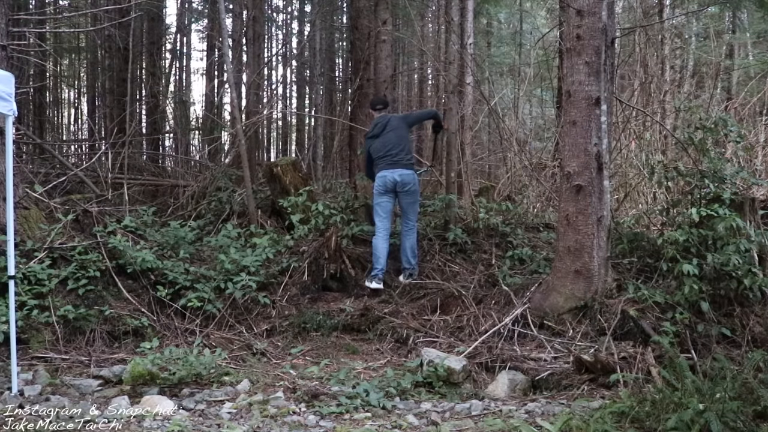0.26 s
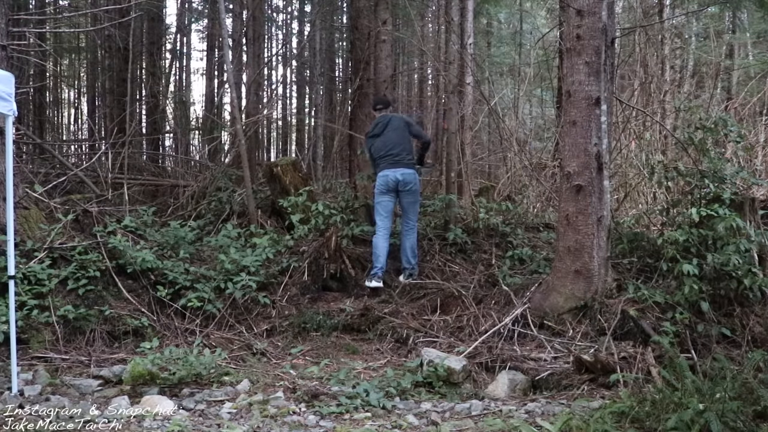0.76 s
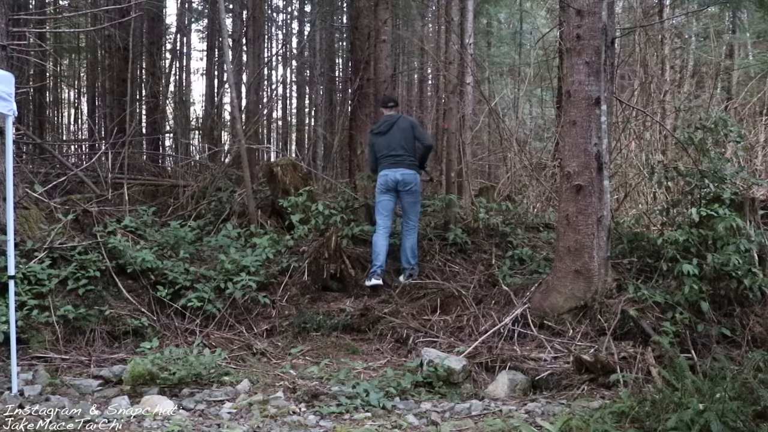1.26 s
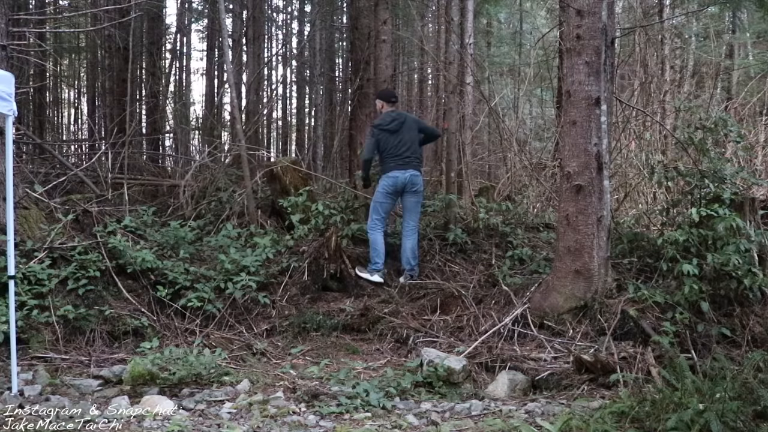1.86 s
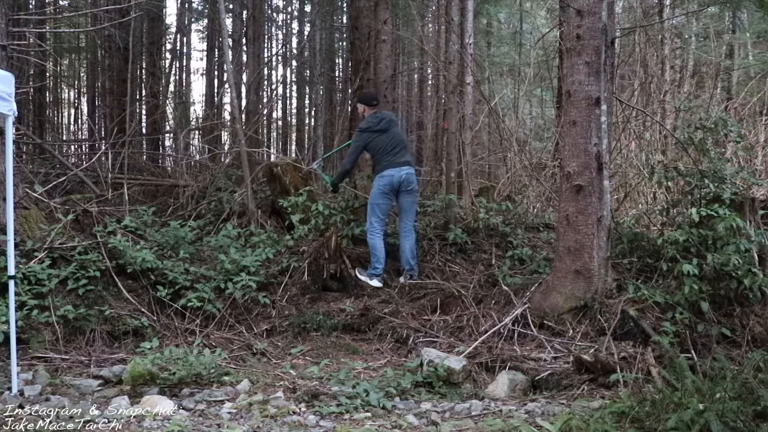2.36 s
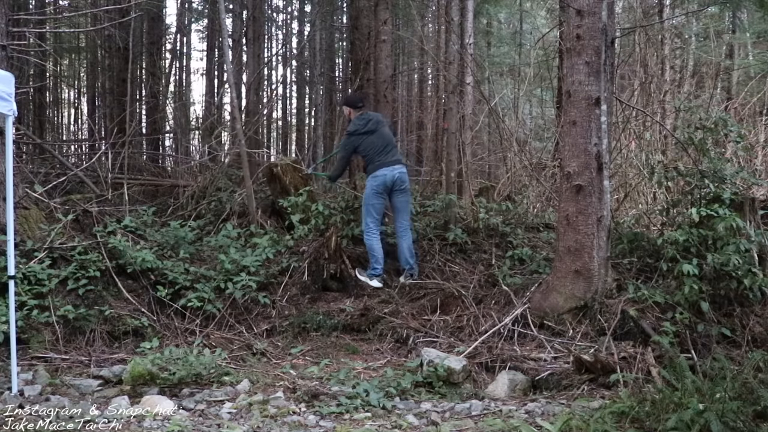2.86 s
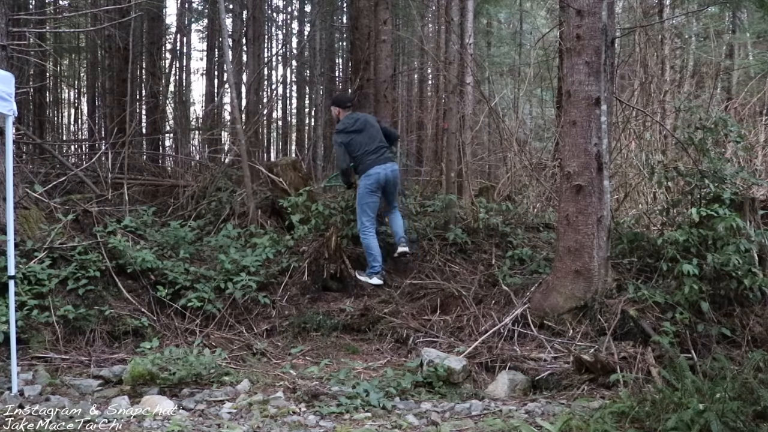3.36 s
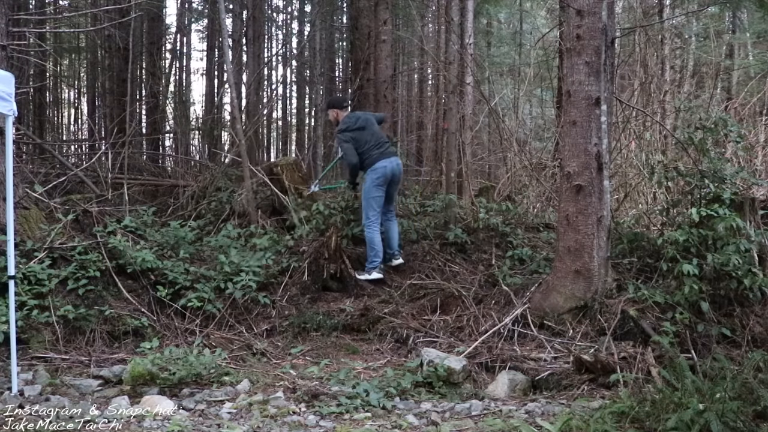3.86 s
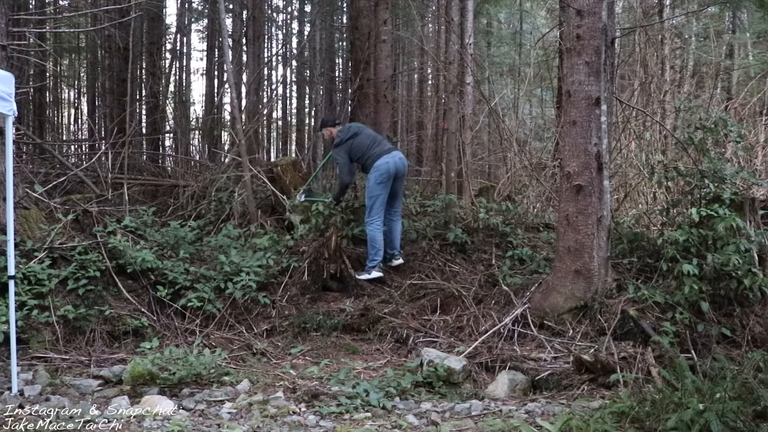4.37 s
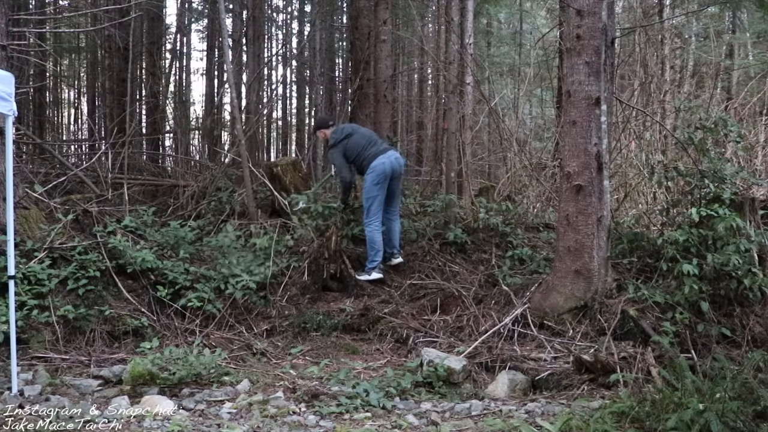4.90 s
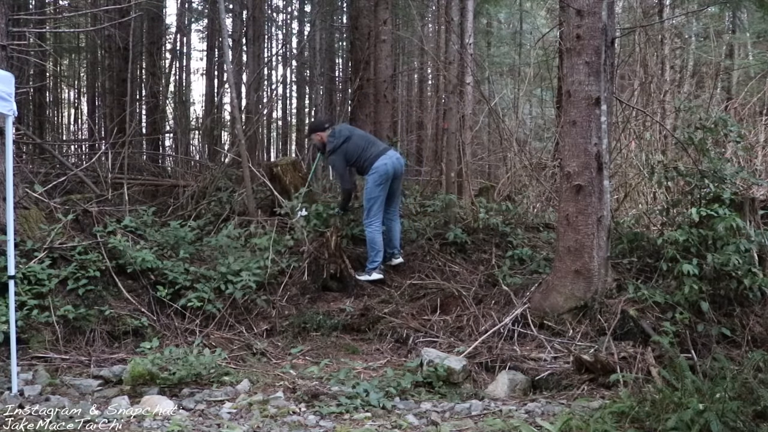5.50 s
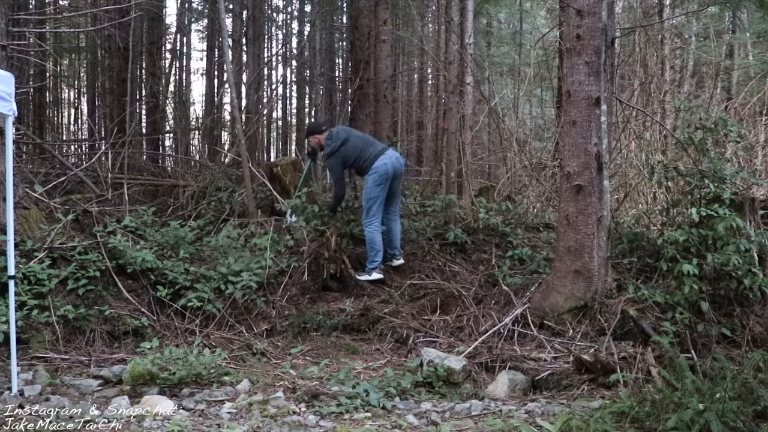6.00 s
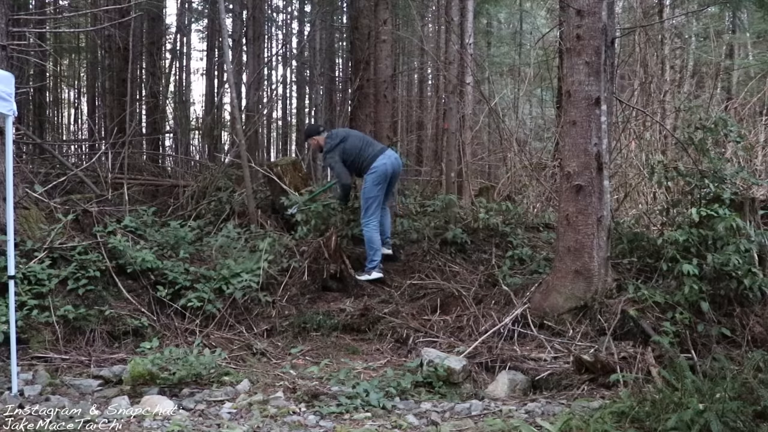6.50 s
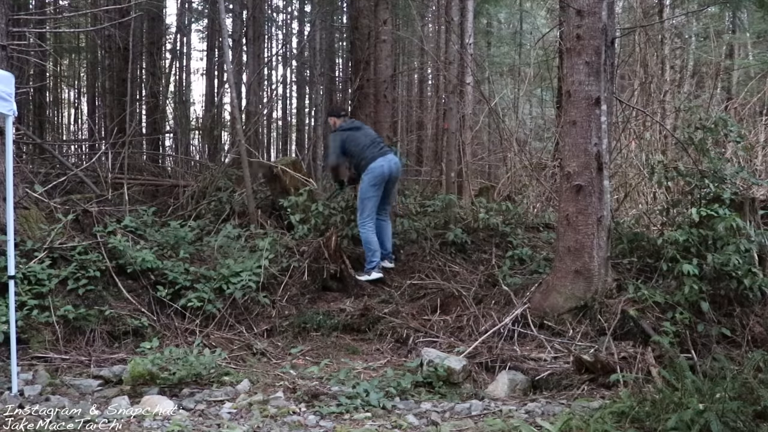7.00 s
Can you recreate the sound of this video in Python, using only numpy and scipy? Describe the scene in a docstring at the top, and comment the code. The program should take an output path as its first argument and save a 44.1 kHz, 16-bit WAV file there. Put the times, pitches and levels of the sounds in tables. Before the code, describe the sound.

Very quiet forest air, then loppers crunch through a branch with a splintering crack; the wood drops with a thud and the steel jaws clack. Twigs snap and litter crunches underfoot. Four more cracks follow at uneven gaps, the last two close together, each with shaken leaves and a metallic clack. Heard from some metres away, with thin echoes from the trunks.

```python
"""Faint outdoor air and small twig snaps open a quiet forest edge; at 0.83 s loppers cut the first branch.
It splits in a quick run of fibre-break bursts ringing the stem; wood drops, steel jaws clack and chatter.
Twigs snap, brush and litter rustle as filtered grains, and steps crunch and thud as the worker moves.
Four more cuts follow near 3.0, 4.6, 6.2 and 7.1 s; noise echoes from the trunks trail each sound."""
import sys
import numpy as np
from scipy import signal
from scipy.fft import rfft, irfft
from scipy.io import wavfile

SR = 44100
rng = np.random.default_rng(int(sys.argv[2]) if len(sys.argv) > 2 else 0)


def pcm_store(signal):
    """Save signal as 16-bit PCM."""
    levels = np.round(np.clip(np.atleast_2d(signal), -1, 1) * 32767)
    wavfile.write(sys.argv[1], SR, levels.astype(np.int16).T)


N = 319725
TIME = np.arange(N) / SR
LEVEL_WINDOW_S = 0.005  # snap and tick levels are rms over this

# branches cut through: (time [s], stem note [Hz], ring [dB], wood body over crack [dB], thud [dB],
# shaken brush [dB], settling [dB/s])
CUTS = [(0.829, 860, -2.5, 2.5, -36, -40, 60), (3.027, 1113, 5, -0.5, -49, -45.5, 32.5),
        (4.632, 767, -7, -2.5, -45, -42, 24), (6.226, 1254, -5, -2.5, -45, -38.5, 45),
        (7.059, 1230, 3, 1.5, -48, -44.5, 66)]
# shoes pressing litter and springy ground: (time [s], crunch [dB], length [s], thud [dB])
STEPS = [(1.157, -39.5, 0.045, -41.5), (1.874, -48.5, 0.033, -47), (3.31, -50.5, .09, -63.5),
         (3.551, -48.5, 0.052, -41), (3.63, -47, 0.067, -42), (3.69, -45.5, 0.069, -38.5),
         (3.83, -56.5, 0.025, -49), (4.95, -48.5, 0.082, -60), (6.62, -46.5, 0.031, -53)]
# resonances of a branch: (frequency [Hz], level [dB], t60 [s])
BRANCH_MODES = [(570, -4, 0.029), (692, 4.5, 0.0088), (980, -4, 0.0055), (1346, 1, 0.031),
                (2130, 3.5, 0.021), (2970, -16, 0.016), (3090, -6, 0.01), (3930, -1.5, 0.059)]


def undb(db):
    """Decibels to gain."""
    return 10 ** (np.asarray(db) / 20)


def unit(x):
    """Scale to rms 1."""
    return x / np.sqrt(np.mean(x ** 2))


def norm(x):
    """Scale to energy 1."""
    return x / np.sqrt(np.sum(x ** 2) + 1e-18)


def add(out, s, x):
    """Mix x into out from time s."""
    i = int(s * SR)
    out[i:i + len(x)] += x[:max(N - i, 0)]


def cut(x, hz, kind, order=4):
    """Butterworth filter."""
    return signal.sosfilt(signal.butter(order, hz, kind, fs=SR, output="sos"), x)


def colour(x, points, size=4096):
    """Minimum-phase filter through (frequency [Hz], level [dB]) points."""
    hz, db = np.transpose(points)
    f = np.maximum(np.arange(size // 2 + 1) * SR / size, 1)
    gain = undb(np.interp(np.log(f), np.log(hz), db))
    # folding the cepstrum makes the response causal
    cepstrum = irfft(np.log(gain))
    cepstrum[1:size // 2] *= 2
    cepstrum[size // 2 + 1:] = 0
    response = irfft(np.exp(rfft(cepstrum)))
    return signal.fftconvolve(x, response)[:len(x)]


def fade(t, t60):
    """Exponential decay, 60 dB down after t60."""
    return np.exp(-np.log(1000) * t / t60)


def walk(rate):
    """Slow random curve with `rate` knots a second and a spread near 1."""
    knots = rng.standard_normal(int(N / SR * rate) + 2)
    return np.interp(TIME * rate, np.arange(len(knots)), knots)


def clicks(count, spread_db):
    """Dense clicks of either sign, a few much larger than the rest."""
    sizes = undb(spread_db * np.minimum(rng.exponential(size=count), 6))
    return rng.standard_normal(count) * sizes


def snap(length_s, levels_db, modes, ring_db, scatter_db, scatter_t60, detune, lead, pitch=1, size=6144):
    """One fibre goes first (`lead`), the rest follow and ring the modes; stems and ground scatter it."""
    # colour of the break: (frequency [Hz], level [dB])
    wood_tone = [(40, -45.5), (100, -22), (270, -27), (450, -15), (720, -1), (1050, 1), (1380, -0.5),
                 (1750, -2), (2100, -1), (2600, -5.5), (3300, 2), (3900, 1.5), (4700, -8), (16000, -32.5)]
    body_top_hz, crack_top_hz = 1864, 3964
    t = np.arange(size) / SR
    first = lead * (t == 0)
    rebound = undb(scatter_db) * norm(clicks(size, 1.1) * fade(t, scatter_t60))
    fibres = clicks(size, 2.5) * np.exp(-(t / length_s) ** 2)
    force = norm(first + norm(fibres)) + rebound

    hz, db, t60 = np.transpose(modes)[:, :, None]
    hz = hz * pitch * (1 + detune * rng.standard_normal(hz.shape))  # each piece has its own size
    ring = norm(np.sum(undb(db) * fade(t, t60) * np.cos(2 * np.pi * hz * t), axis=0))
    ringing = norm(signal.fftconvolve(force, ring)[:size])
    sound = norm(colour(force, np.array(wood_tone) * [pitch, 1])) + undb(ring_db) * ringing
    body = cut(cut(sound, body_top_hz * pitch, "low", order=2), 2460, "low")
    crack = cut(cut(sound, body_top_hz, "high"), crack_top_hz, "low", order=8)

    # the sharpest treble comes as the break starts
    tearing = norm(clicks(size, 6.0) * np.exp(-t / (1.2 * length_s)))
    tear = norm(first + tearing) + 2.03 * rebound
    edge_tone = [(4500, 1), (6500, 5), (9500, 0.0), (13000, 2.5), (16000, -10)]
    edge = colour(cut(tear, crack_top_hz, "high", order=6), edge_tone)
    parts = sum(undb(d) * norm(p) for d, p in zip(levels_db, (body, crack, edge)))
    return parts * np.sqrt(LEVEL_WINDOW_S * SR)


def branches():
    """Each cut is a run of fibre breaks ringing the stem, fullest near the break through the heartwood."""
    # fibre bundles giving way, before the output filter and trim:
    # (time [s], break length [s], crack level [dB], tearing edge over crack [dB])
    splits = [(0.7629, 0.0042, -24, -18), (0.7862, 0.0023, -23.5, -3), (0.793, .015, -21.5, -7),
              (.802, .01, -18, -12), (.812, 0.031, -16.5, -6), (0.8333, 0.0039, -18.5, -0.5),
              (.837, 0.0093, -17, -19.5), (2.944, 0.013, -35.5, -23.5), (2.966, 0.0058, -23.5, -13),
              (2.9781, 0.00097, -19, -10), (2.987, 0.028, -27, -4), (3.002, 0.0046, -15.5, -10),
              (3.021, .0046, -15, -15), (3.0259, .0056, -9.5, -12.5), (4.572, 0.0037, -25.5, -3.5),
              (4.602, 0.0034, -29, -20), (4.6081, 0.0066, -15.5, -16.5), (4.614, 0.0048, -13.5, -8),
              (4.624, 0.014, -22, -15.5), (4.633, .0048, -14.5, -7.5), (4.6382, 0.0043, -9.5, -12.5),
              (6.176, 0.011, -26.5, -16), (6.1938, 0.0034, -13.5, -5), (6.1998, 0.0011, -18.5, -23.5),
              (6.216, 0.0067, -12.5, -7.5), (6.221, 0.0059, -11, -14.5), (6.2252, .005, -15, -19.5),
              (7.043, 0.024, -22, -7.5), (7.055, 0.0045, -14, -8.5), (7.063, 0.007, -15.5, -9.5)]
    bark_thin_db, heart_s = 8.5, 0.023  # outer fibres have less body than the heartwood
    out = np.zeros(N)
    for s, length_s, db, edge_db in splits:
        through_s, note_hz, ring_db, body_db, *_ = min(CUTS, key=lambda row: abs(row[0] - s))
        outer = 1 - np.exp(-abs(through_s - s) / heart_s)
        levels_db = (db + body_db - bark_thin_db * outer, db, db + edge_db)
        modes = [*BRANCH_MODES, (note_hz, 6, .022)]
        add(out, s, snap(length_s, levels_db, modes, ring_db, scatter_db=-11, scatter_t60=.06,
                         detune=.025, lead=.35))
    return cut(out, 450, "high", order=2) * undb(-1.7)  # a thin stem radiates little bass


def jaws(size=12000):
    """The blade slips out of the cut, the steel rings briefly and the loose joint chatters."""
    # jaws coming free: (time [s], strongest note [Hz], ring [dB], crack level [dB], edge over crack [dB])
    clacks = [(1.023, 3420, 24, -39, -1.5), (1.702, 3686, -4, -25, -8.5), (3.279, 3760, -4.5, -28, -3.5),
              (4.8089, 3940, -8.5, -23, -7.5), (6.425, 3880, -18, -23, -7), (7.2033, 3370, 7, -27, -17)]
    # steel resonances: (frequency [Hz], level [dB], t60 [s])
    steel_modes = [(716, -13, 0.054), (1532, -8.5, 0.051), (2380, -12, 0.029), (3480, -18.5, 0.026),
                   (3870, -12.5, 0.021), (4170, -7, 0.046)]
    # colour of loose blade and handles: (frequency [Hz], level [dB])
    chatter_tone = [(600, -23), (1100, -8.5), (2200, -16.5), (3300, -20), (4100, 10.5), (4700, -12.5),
                    (5600, -18), (8000, -15.5), (12000, -16), (16000, -31)]
    body_db, chatter_db, chatter_t60_s = -9, -19.5, 0.39  # levels relative to the crack
    out, t = np.zeros(N), np.arange(size) / SR
    for s, note_hz, ring_db, db, edge_db in clacks:
        modes = [*steel_modes, (4500, -7, .04), (note_hz, 0, .035)]
        levels_db = (db + body_db, db, db + edge_db)
        add(out, s, snap(0.0037, levels_db, modes, ring_db, scatter_db=-6, scatter_t60=0.042,
                         detune=0.0045, lead=0.55))
        chatter = unit(colour(clicks(size, 3.5), chatter_tone)) * fade(t, chatter_t60_s)
        add(out, s + .002, undb(db + chatter_db) * chatter)
    return out


def ticks(size=2048):
    """Thin stiff needles and grit tick only in the highest treble."""
    # dry ticks: (time [s], level [dB])
    tick_rows = [(1.025, -32.5), (1.119, -46), (1.348, -45), (2.018, -45), (3.654, -41.5), (3.73, -49),
                 (6.643, -52)]
    tone = [(3000, -31), (7000, -14), (11000, -4), (13500, 1), (16000, 0.0)]
    out, t = np.zeros(N), np.arange(size) / SR
    for s, db in tick_rows:
        tick = colour(clicks(size, 1.7) * fade(t, 0.019), tone)
        add(out, s, undb(db) * norm(tick) * np.sqrt(LEVEL_WINDOW_S * SR))
    return out


def boughs(start_hz=270, rest_hz=55, size=20000):
    """Jolts send bending waves down the boughs; high ones run faster, so each arrives as a sinking thud."""
    # wood landing on the ground: (time [s], thud [dB], 1/e fade [s])
    drops = [(.951, -32.5, .05), (2.546, -59, 0.027), (2.841, -55, 0.017), (3.191, -51, .024),
             (4.008, -54, .008), (6.647, -48.5, 0.018)]
    cut_contact_s, step_contact_s, drop_contact_s = .01, .027, 0.0041
    cut_fade_s, step_fade_s = 0.092, 0.07
    out, t = np.zeros(N), np.arange(size) / SR
    hz = rest_hz + start_hz * np.exp(-t / .026)
    jolts = [(s, db, cut_contact_s, cut_fade_s) for s, _, _, _, db, _, _ in CUTS]
    jolts += [(s, db, step_contact_s, step_fade_s) for s, _, _, db in STEPS]
    jolts += [(s, db, drop_contact_s, fade_s) for s, db, fade_s in drops]
    for s, db, contact_s, fade_s in jolts:
        envelope = np.exp(-t / fade_s) * (1 - np.exp(-t / 0.0081))
        wave = np.sin(2 * np.pi * np.cumsum(hz) / SR) * envelope
        wave = cut(wave, 95, "high", order=1)  # the slow deep waves radiate weakly
        strike = norm(clicks(size, 6.7) * np.exp(-t / contact_s))
        contact = strike + 0.21 * norm(clicks(size, 0.99) * fade(t, 0.4))
        ground = norm(cut(cut(contact, 460, "low", order=2), 50, "high", order=2))
        thud = norm(norm(signal.fftconvolve(contact, wave)[:size]) + 0.93 * ground)
        add(out, s, undb(db) * thud * np.sqrt(0.0093 * SR))  # rms over 9.3 ms
    return out


def crackle(rate, spread_db, bed_db):
    """Tiny contacts at `rate` a second, each smeared by the foliage, over a soft bed of rubbing."""
    struck = (rng.random(N) < rate / SR) * rng.choice([-1, 1], N)
    grains = struck * undb(spread_db * np.minimum(rng.exponential(size=N), 4.5))
    power = signal.lfilter([1], [1, -np.exp(-1 / (0.0036 * SR))], grains ** 2)
    smeared = unit(np.sqrt(power) * rng.standard_normal(N))
    bed = undb(bed_db) * rng.standard_normal(N)
    return unit(smeared + 0.43 * unit(grains) + bed)


def pressing():
    """The weight of each step comes on, holds and lets go."""
    power = np.zeros(N)
    for s, db, length_s, _ in STEPS:
        half_s = length_s / 2
        power += undb(2 * db) * np.exp(-((TIME - s - half_s) / half_s) ** 4)
    return np.sqrt(power)


def steps(weight):
    """A shoe presses needles and rotten sticks into a short dull crunch."""
    tone = [(60, -11.5), (200, 1.5), (450, -7.0), (800, -1), (1300, -7), (2200, -11), (4000, -17.0),
            (5000, -27.5), (16000, -28.5)]
    return unit(colour(crackle(rate=540, spread_db=12, bed_db=-1.5), tone)) * weight


def twig(db, thickness):
    """Small dry wood breaks in one go; a thicker stick is duller, lower and slower."""
    tilt_db, edge_db, dull_db = 15.5, -16.5, 12  # thick sticks trade crack for body and lose their edge
    levels_db = (db - tilt_db * (1 - thickness), db - tilt_db * thickness, db + edge_db - dull_db * thickness)
    bulk = thickness ** 2
    return snap(.002 + 0.0036 * bulk, levels_db, BRANCH_MODES, ring_db=-4, scatter_db=-9,
                scatter_t60=0.064, detune=.08, lead=.55, pitch=2 ** (-.7 * bulk))


def twigs(rustle):
    """A few sticks snap clearly; many small ones go at random, as hard as the brush is moving."""
    # louder sticks: (time [s], level before tilt and output trim [dB], thickness [0-1])
    loud_twigs = [(0.027, -50, 0.37), (.949, -26, 1), (1.192, -26, 1), (1.314, -37, 0.2),
                  (1.671, -41.5, 0.2), (1.815, -38, 0.28), (1.897, -34.5, 0.1), (2.017, -40, 0.32),
                  (2.106, -46, 0.1), (2.143, -47.5, 0), (2.182, -48, .05), (2.203, -48.5, .3),
                  (2.45, -46, 0.35), (2.546, -42, 0.79), (2.632, -45.5, 0.26), (2.841, -37.5, 1),
                  (3.341, -30, 0.4), (3.515, -37.5, 0.14), (3.569, -35.5, 0.6), (4.44, -39.5, 0.33),
                  (4.882, -32, 0), (4.998, -36.5, 0.16), (5.442, -40, 0.37), (5.682, -46.5, 0.3),
                  (5.816, -41, 0.68), (6.38, -34.5, 0.23), (6.872, -44.5, 0.78), (7.154, -41, 0.16)]
    small_per_s, small_db, small_spread_db = 9.9, 8, 10.5  # levels over the rustle, before tilt and trim
    out = np.zeros(N)
    for s, db, thickness in loud_twigs:
        add(out, s + 0.0012, twig(db, thickness))
    for when, strength, thickness in rng.random((int(small_per_s * N / SR), 3)):
        db = small_db + small_spread_db * (2 * strength - 1)
        add(out, when * N / SR, rustle[int(when * N)] * twig(db, thickness / 2))
    return out * undb(-0.5)


def shaking():
    """Each cut lets the bush spring back: it shakes at once and settles at a steady rate."""
    rise_s = 0.026
    power = np.zeros(N)
    for s, *_, db, settle_db_per_s in CUTS:
        age = np.maximum(TIME - s, 0)
        power += (undb(db - settle_db_per_s * age) * (1 - np.exp(-age / rise_s))) ** 2
    return np.sqrt(power)


def undergrowth(rustle, shifting):
    """Leaves brush past tool and clothes, dry tips tick, and the soft litter shifts underfoot."""
    # colour of leaves and tips: (frequency [Hz], level [dB])
    brush_tone = [(300, -13.5), (700, -1), (1500, -1.5), (2600, -1), (3700, 2.5), (4200, -3.5), (4800, -11),
                  (7000, -13.5), (11000, -20.5), (16000, -25.5)]
    # colour of ground litter: (frequency [Hz], level [dB])
    litter_tone = [(25, -15.5), (70, -3), (130, 0), (300, -2.5), (700, -4.5), (1300, -12), (2500, -25.5)]
    leaves = unit(colour(crackle(rate=960, spread_db=5.5, bed_db=0.0), brush_tone)) * undb(2.0 * walk(25))
    contacts = (rng.random(N) < 35 / SR) * rng.standard_normal(N)  # 35 a second
    scraping = signal.lfilter([1], [1, -np.exp(-1 / (.002 * SR))], contacts) * rng.standard_normal(N)
    tips = unit(colour(scraping, brush_tone)) * undb(-5)
    tread = unit(colour(crackle(rate=220, spread_db=3.5, bed_db=-3), litter_tone)) * undb(1.1 * walk(11))
    return (leaves + tips) * rustle + tread * shifting


def forest(x, size=70000):
    """Near trunks answer at once; deeper ones leave a long thin tail that loses its treble."""
    t = np.arange(size) / SR
    onset = 1 - np.exp(-(t / 0.0037) ** 2)
    near = norm(cut(clicks(size, 2.0), 14000, "low", order=1) * onset * fade(t, 0.21))
    far = cut(clicks(size, 4.7), 400, "high", order=1) * onset
    far_low = cut(far, 4900, "low", order=2) * fade(t, 1.4)
    far_high = cut(far, 3900, "high", order=2) * fade(t, .9)
    echoes = undb(-14.5) * near + undb(-37.5) * norm(far_low + far_high)
    return signal.fftconvolve(x, echoes)[:N]


def air():
    """Faint outdoor background: coloured noise whose level drifts slightly."""
    # colour of the background: (frequency [Hz], level [dB])
    air_tone = [(15, -52), (25, -6.5), (53, -13), (76, -10.5), (127, -6.5), (170, -9.5), (249, -8),
                (309, -6.5), (476, -8.5), (1890, -24.5), (3620, -30.5), (4740, -29.5), (16000, -30.5)]
    return unit(colour(rng.standard_normal(N), air_tone)) * undb(-67 + .6 * walk(3.5))


def scene():
    """Stirring, shaken bushes and steps move the undergrowth; all the woodwork sounds through the trees."""
    # how busily the worker stirs the undergrowth: (time [s], rustle [dB])
    stir_levels = [(0, -80), (.72, -72), (1.1, -55.5), (1.42, -62), (1.75, -57), (2.25, -63), (2.85, -66.5),
                   (3.25, -56), (3.7, -54.5), (4.35, -66.5), (4.55, -58), (5.55, -67), (6.05, -63),
                   (6.18, -47.5), (6.35, -56), (6.75, -57), (7.0, -81), (7.25, -58)]
    tread_db, shaken_litter_db = -6.5, -13.5  # litter under the stirring and under a shaken bush
    step_rustle_db = -10  # leaves under a step
    stir, shake, weight = undb(np.interp(TIME, *np.transpose(stir_levels))), shaking(), pressing()
    rustle = np.sqrt(stir ** 2 + shake ** 2 + (undb(step_rustle_db) * weight) ** 2)
    shifting = np.hypot(undb(tread_db) * stir, undb(shaken_litter_db) * shake)
    work = branches() + jaws() + ticks() + boughs() + steps(weight) + twigs(rustle)
    return (work + forest(work) + undergrowth(rustle, shifting) + air())[None]


def record(dry):
    """Smooth saturation rounds the tallest peaks; a steep low-pass cuts the top above 16 kHz."""
    rounded = dry / (1 + dry ** 4) ** (1 / 4)
    return signal.sosfilt(signal.ellip(10, .2, 80, 16000, fs=SR, output="sos"), rounded)


dry = scene()
out = record(dry)
pcm_store(out)
```